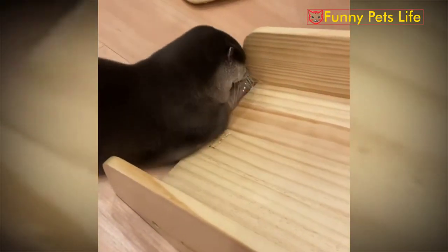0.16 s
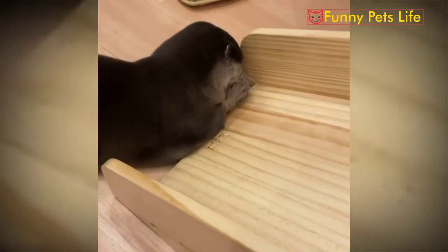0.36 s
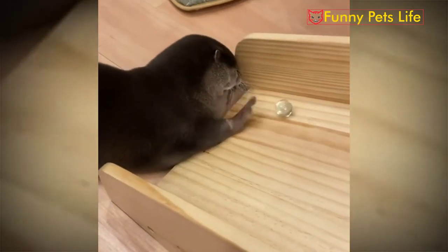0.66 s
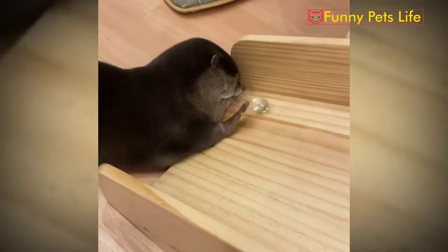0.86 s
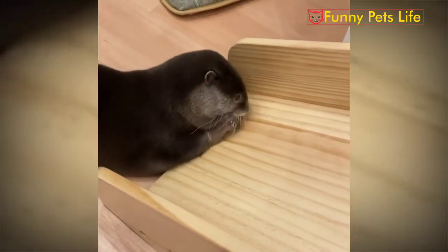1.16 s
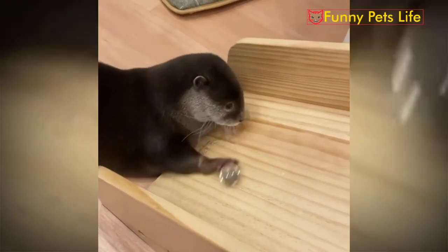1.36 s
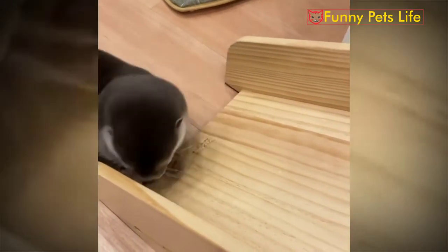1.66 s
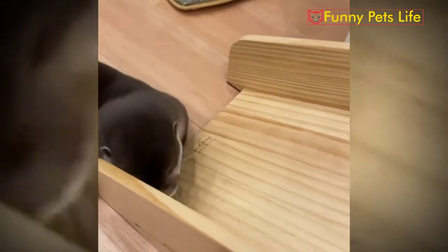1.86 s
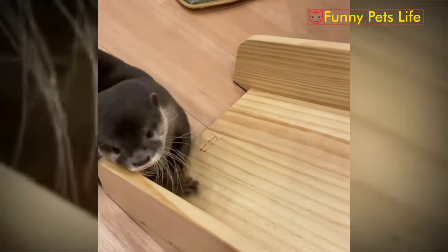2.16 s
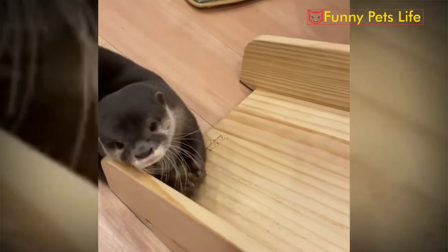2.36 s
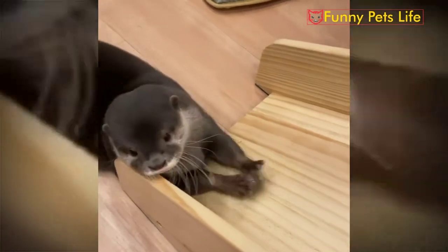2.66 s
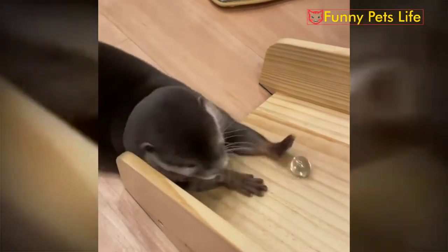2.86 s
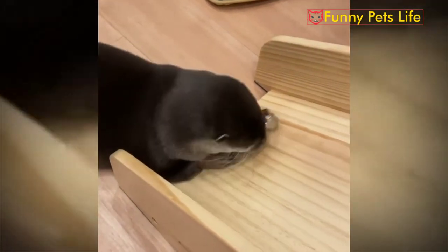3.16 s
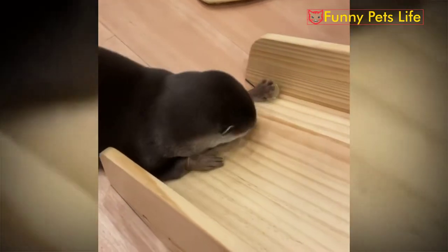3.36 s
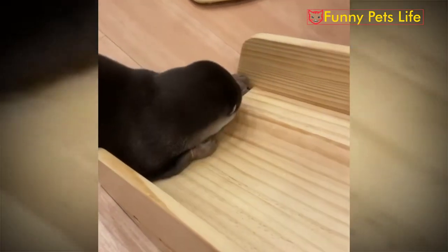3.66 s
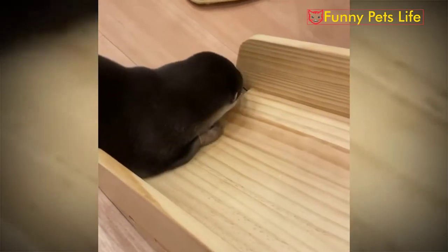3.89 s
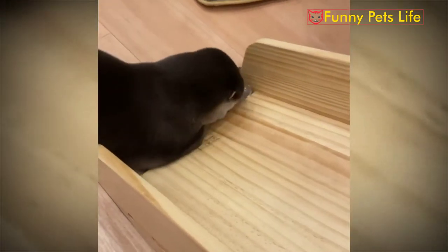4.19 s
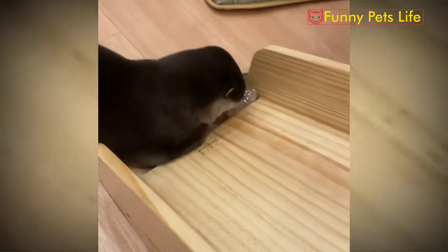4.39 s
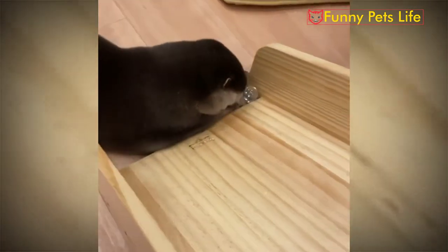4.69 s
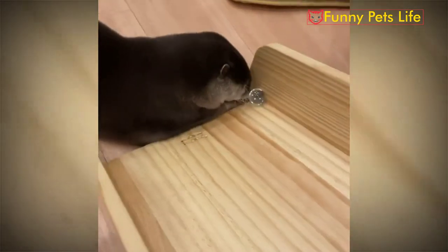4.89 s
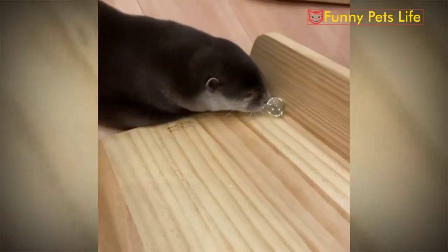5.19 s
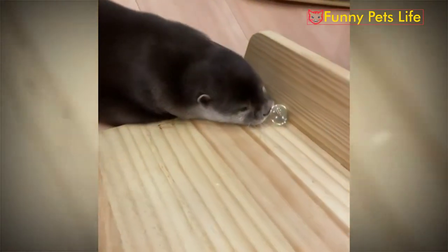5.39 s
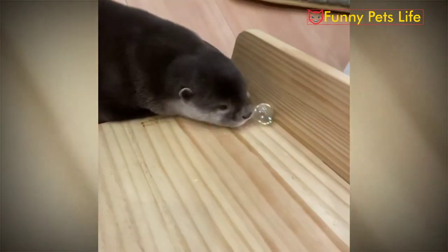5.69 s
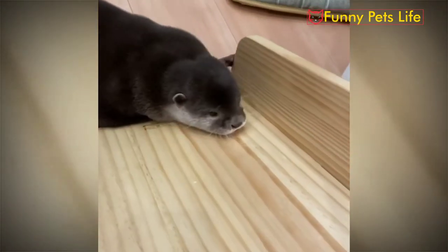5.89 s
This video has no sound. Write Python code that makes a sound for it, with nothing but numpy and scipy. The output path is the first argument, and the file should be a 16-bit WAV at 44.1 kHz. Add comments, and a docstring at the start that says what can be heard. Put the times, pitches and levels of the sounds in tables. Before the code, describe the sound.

A glass marble rumbles and clacks around a hollow wooden tray as an otter pushes it, with faint brushing of fur and paws.

```python
"""A glass marble rumbles over the grain of a hollow wooden tray as an otter pushes it about.
It bounces on the boards and clacks against the rim; the boards carry each blow as a bending wave,
treble first. Fur and paws brush the wood. A handheld phone, a step away, hears it all in a small
room that rings on over a quiet hum."""
import sys
import numpy as np
from scipy import signal
from scipy.fft import rfft, irfft
from scipy.io import wavfile
from scipy.ndimage import uniform_filter1d

SR = 44100
rng = np.random.default_rng(int(sys.argv[2]) if len(sys.argv) > 2 else 0)


def unload_audio(sound):
    """Save the sound as a 16-bit wav file, at the path given as the first command line argument."""
    columns = np.transpose(np.atleast_2d(sound))
    # keep every value between -1 and 1, then stretch to whole-number steps
    steps = np.round(np.clip(columns, -1, 1) * 32767)
    wavfile.write(sys.argv[1], SR, steps.astype(np.int16))


N = 266212

# The rolling marble, one list per stretch. Each row: time in seconds, level in dB, extra grit gain in dB.
ROLLS = [
    [(0.0, -28, -2), (0.048, -25.5, -13), (0.13, -36.5, -5)],
    [(0.2, -49, 8), (0.354, -45.5, -4), (0.44, -69, 12), (0.445, -56, -3)],
    [(0.5, -32.5, -24), (0.69, -29.5, -49), (0.734, -85, -19), (0.798, -38, -33), (0.812, -40.5, -35),
     (0.895, -31.5, -31)],
    [(0.94, -29.5, -27), (1.024, -43, -18), (1.104, -24.5, -34), (1.21, -47.5, -37), (1.27, -21.5, -23),
     (1.29, -17.5, -10), (1.35, -17.5, -14.5), (1.438, -24.5, -14), (1.46, -32.5, 5)],
    [(1.52, -57, 1), (1.582, -33, -16), (1.7, -25, -18), (1.91, -73, 19.5), (1.92, -48, -14),
     (2.002, -66.5, 5), (2.078, -36, -25), (2.26, -49.5, -41)],
    [(2.27, -44.5, -25), (2.35, -30.5, -11.5), (2.41, -45, -16), (2.506, -42, -13), (2.622, -24.5, -16),
     (2.67, -35, -4.5)],
    [(2.68, -32.5, -8.5), (2.702, -23.5, -30), (2.83, -34, -41), (2.93, -24, -27), (2.985, -22, -18),
     (3.036, -21, -26), (3.06, -27.5, -28), (3.08, -37, -31)],
    [(3.09, -37, -38), (3.128, -28, -14), (3.158, -15.5, -23), (3.18, -18, -22), (3.215, -16.5, -14.5),
     (3.24, -23, -13)],
    [(3.33, -36, -4.5), (3.374, -43, -9), (3.59, -40, -9)],
    [(3.615, -32, -1.5), (3.638, -22, -4.5), (3.736, -53.5, 2), (3.76, -53, -17)],
    [(4.77, -58.5, 13.5), (4.815, -43, 1.5), (4.83, -41.5, -11), (4.858, -34.5, -27), (4.936, -48, -35),
     (4.992, -29, -14), (5.044, -24, -24), (5.148, -41.5, -17), (5.165, -42, -21.5), (5.19, -36, -20),
     (5.25, -39, -18), (5.28, -46.5, -17.5), (5.3, -42.5, -21), (5.36, -43, -9), (5.4, -41.5, -12.5),
     (5.44, -52.5, -1.5), (5.486, -37.5, -29), (5.535, -55, -33), (5.56, -69, -21), (5.6, -78, -24)],
    [(5.61, -58.5, -3.5), (5.64, -50, -2), (5.674, -30.5, -10), (5.74, -28.5, -8), (5.765, -25.5, -14.5),
     (5.81, -28, -9), (5.87, -28.5, -13), (5.925, -32, -12)],
    [(5.96, -33, 6.5), (5.988, -42, 1.5), (6.035, -26.5, -7)],
]
# Soft jolts as the marble crosses a ridge of the grain. Each row: time in seconds, boost in dB.
JOLTS = [(0.32, 12.5), (0.672, 1.5), (0.819, 8), (0.851, 8.5), (1.106, -0.5), (2.608, 4), (2.705, 6.5),
         (2.735, 4.5), (3.002, -3), (3.037, 3.5), (3.153, 7), (4.841, 13.5), (4.987, 4), (5.77, 8),
         (5.84, 2.5), (5.901, 10)]
# The tray floor's modes, the tones it rings with. Each row: pitch in Hz, level in dB,
# seconds to fade by 60 dB (capped by LOADED_T60_S).
BOARD_MODES = [(92.4, 13, 0.2), (177.5, -9.5, 0.19), (213.1, -5, 0.2), (243.8, -0.5, 0.1),
               (281.4, -5.5, 0.1), (306, -7.5, 0.051), (336.8, -1, 0.077), (368.3, 0, 0.073),
               (409.4, -4.5, 0.04), (451, -6, 0.072), (479.3, -5.5, .07), (521, 2, 0.2), (556.3, -6, 0.14),
               (607.4, -2, 0.1), (656.3, 2, 0.073), (708.5, 4, 0.026), (783, 5, 0.043), (838.3, -3, 0.077),
               (943.6, 3, 0.41), (1041, 4.5, 0.14), (1118.3, 6, 0.18), (1225, 8.5, 0.23), (1390, 2, 0.11),
               (1559, 5.5, 0.14), (1667, 6.5, 0.25), (2229, 9, 0.068), (2628, 2.5, 0.018),
               (3436, 0.5, 0.0074)]
# The pitch regions that ring under the moving marble. Each row: time in seconds, low region in Hz,
# upper region in Hz, gain of the upper region in dB, gain of a top region above it in dB.
REGIONS = [(0, 335, 810, 4, 6), (.3, 285, 630, 3, 2), (.6, 298, 688, 2.5, -39),
           (1.1, 336, 663, -12.5, -43.5), (1.25, 353, 710, 9, -23), (1.31, 400, 666, -12, -24),
           (1.4, 275, 730, -5, -10), (1.7, 330, 620, -0.5, -6.5), (2.1, 340, 614, -4, -38),
           (2.31, 342, 800, 11, -17), (2.36, 363, 594, 6.5, -12), (2.43, 360, 565, 7, -12),
           (2.52, 402, 716, 18, -12), (2.57, 402, 666, 22, -4), (2.62, 347, 563, 13.5, 8.5),
           (2.67, 405, 590, 16, -2), (2.7, 463, 615, -8, -3), (2.745, 350, 594, -14, -8.5),
           (2.85, 304, 567, 0, -25), (2.93, 214, 667, -10.5, -23), (2.99, 277, 686, -11, -16.5),
           (3.04, 352, 705, -12, -35), (3.16, 318, 690, -8, -39), (3.24, 300, 674, 4, 2.5),
           (3.4, 280, 726, 13.5, -1), (3.7, 343, 810, 4.5, -12.5), (4.8, 328, 534, -3.5, 11),
           (4.87, 342, 536, 2.5, -0.5), (5.03, 235, 512, 1, -2.5), (5.1, 266, 520, 2, -6.5),
           (5.2, 300, 510, -1, -9), (5.3, 293, 516, 6, -7.5), (5.5, 295, 520, 9, -0.5),
           (5.66, 219, 520, -13, -20.5), (5.77, 237, 530, -5, -3), (5.84, 230, 530, -12, -6),
           (5.9, 248, 525, -4, 1), (6.0, 331, 615, 7, -3)]
# The upper region narrows along the rim, where one board sings.
# Each row: time in seconds, width in octaves.
UPPER_WIDTH = [(0, 0.25), (2.4, 0.36), (2.55, 0.16), (2.7, 0.28), (4.7, 0.6), (4.8, 0.1), (5.55, 0.058),
               (5.91, 0.047), (6.0, 0.16)]
# The tone colour of the room's hum. Each row: pitch in Hz, gain in dB.
HUM_COLOUR = [(15, -39), (25, -29.5), (50, -12.5), (101, -8), (166, -17.5), (671, -9), (786, -11),
              (897, -7.5), (1370, -16.5), (1730, -45.5), (1920, -23), (3010, -15.5), (11800, -36),
              (13500, -58)]
# The marble's blows. Each row: start in seconds, level in dB, contact pitch in Hz, fall above that pitch
# in dB per octave, rim against boards in dB, travel time of a 700 Hz bending wave in milliseconds.
BLOWS = [(.025, -11.5, 655, 3.5, -38, 3.01), (.140, -9, 770, -2.5, 15.5, 2.9),
         (.1445, -10.5, 900, 4, 9.5, 2.17), (.152, -7.5, 1400, 19, -27, 2.93),
         (.168, -11.5, 1220, 10, 10, 3), (.181, -23, 910, 17, -2, 3), (.453, -2, 840, 11, -12.5, 2.69),
         (.462, -18, 600, 9, -35.5, 2.78), (.844, -20, 704, 15, -33, 1.15), (.902, -5.5, 764, 8, -26, 3.3),
         (1.295, -8, 636, 6, -12, 2.65), (1.470, 3.5, 1470, 8.5, -3, 2.6),
         (1.709, -27, 1200, -12.5, 0.5, 3.6), (3.246, -9.5, 1310, 12, -7, 4.4),
         (3.255, 5.5, 1400, 3, -5, 2.14), (3.260, -12.5, 1220, 22, -24, 2.16),
         (3.306, -7.5, 1390, 17.5, -6.5, 2.16), (3.604, 2.5, 660, -1, -5.5, 3.07),
         (3.893, -17, 700, 5, -32, 3.23), (4, -32, 1900, -4.5, -1, 2.3),
         (4.112, -3.5, 1620, 18, -3.5, 3.17), (4.123, -4, 1150, 15.5, -20, 3.12),
         (4.125, -11, 1380, -2.5, 18.5, 3.33), (4.383, -7, 770, 3, -22.5, 2.77),
         (4.431, -10, 810, 4, -40.5, 2.08), (4.459, 3, 1700, 10, -8, 2.28), (4.472, -9, 1080, 9, -32, 2.87),
         (4.48, -8.5, 1200, 4.5, 9.5, 2.68), (4.489, -3, 1110, 9, 9.5, 2.88),
         (5.687, -20, 1100, 7, -23.5, 1.23), (5.750, -8, 1140, 10, -36, 1.8),
         (5.797, -26, 1000, -8.5, 9, 4), (5.891, -11, 1140, 27, -40, 1.27), (5.932, 4, 640, 1, -8.5, 0.76),
         (6.017, -7, 671, 2.5, -4, 1.44)]
# The tones of the upright rim. Each row: pitch in Hz, level in dB, seconds to fade by 60 dB.
RIM_MODES = [(2403, -6.5, 0.012), (2775, -1, .009), (2947, 1, 0.014), (3407, -4.5, 0.006),
             (4134, -5, 0.009), (4706, -7, .008), (5510, -9.5, .008), (6480, -12.5, .006),
             (10400, -23.5, .004)]
# Fur and paws on the wood. Each row: time in seconds, gain in dB.
FUR_GAIN = [(0.0, -84), (0.23, -91), (.35, -73.5), (.43, -92.5), (0.599, -64.5), (0.74, -102), (1.2, -79),
            (1.31, -66), (1.44, -75.5), (1.98, -72.5), (2.15, -72), (2.25, -93), (2.37, -75), (2.52, -77.5),
            (3.17, -68), (3.34, -80.5), (4.45, -78.5), (4.6, -70), (4.73, -71), (5.4, -85.5), (5.58, -104),
            (5.66, -85), (5.84, -68), (6.03, -89)]
# Timing at the phone's two microphone openings. Each row: pitch in Hz, lead of the left one in radians.
PORT_LEAD = [(0, 0), (860, -.7), (2070, 0), (2580, 1.4), (3620, .6), (5600, .3), (6460, 2.9), (8870, 3.1),
             (9730, 6.1), (12300, 6.4), (22050, 6.4)]
# Balance between those openings. Each row: pitch in Hz, left minus right in dB.
PORT_TILT = [(60, -0.5), (110, 0.5), (200, -1), (360, -4), (660, -6), (1190, -6.5), (2170, 0), (3940, -3),
             (7170, 3), (13000, -2.5)]
# How long the room rings. Each row: pitch in Hz, seconds to fade by 60 dB.
ROOM_DECAY = [(150, 0.41), (500, 0.48), (2000, 0.54), (5000, 0.38), (12000, 0.062)]
# The microphone's tone colour. Each row: pitch in Hz, gain in dB.
MIC_COLOUR = [(200, 13), (5500, -15.5), (8000, -22.5), (10500, -22.5), (12400, -25.5), (13600, -36.5)]

LOADED_T60_S = 0.17  # the otter's weight lets no board take longer to fade by 60 dB


def undb(db):
    """Turn decibels into a gain."""
    return 10 ** (np.asarray(db) / 20)


def unit(x):
    """Scale x to an average power of 1."""
    return x / np.sqrt(np.mean(x ** 2))


def shape(x, points, turn=0):
    """Colour x by (Hz, dB) points and turn its phase."""
    hz = np.fft.rfftfreq(x.shape[-1], 1 / SR) + 1
    at, db = np.transpose(points)
    gain = undb(np.interp(np.log(hz), np.log(at + 1), db))
    return irfft(rfft(x) * gain * np.exp(1j * turn), x.shape[-1])


def curves(rows):
    """Join a table's rows over time: one curve for each column after the first."""
    times, *columns = np.transpose(rows)
    return [np.interp(np.arange(N) / SR, times, column) for column in columns]


def drift(rate, count=1):
    """Random curves that glide to a new value rate times a second."""
    hold = int(SR / rate)
    steps = np.repeat(rng.standard_normal((count, N // hold + 1)), hold, axis=1)
    return 1.3 * uniform_filter1d(steps, hold)[:, :N]


def even(x, hz):
    """Level out the chance peaks, about hz wide, in the spectrum of a noise burst."""
    size = 2 * x.shape[-1]
    spectrum = rfft(x, size)
    mean = lambda width: np.sqrt(uniform_filter1d(np.abs(spectrum) ** 2, 1 + int(width * size / SR)))
    return irfft(spectrum * mean(30 * hz) / mean(hz), size)[..., :x.shape[-1]]


def ring(x, hz, t60):
    """One mode shaken by x, with the same power whatever its decay."""
    r = np.exp(-np.log(1000) / (t60 * SR))
    return np.sqrt(1 - r) * signal.lfilter([1, 0, -1], [1, -2 * r * np.cos(2 * np.pi * hz / SR), r * r], x)


def rumble(bumps):
    """The bumps' energy is shared among the board modes under the marble."""
    low_hz, upper_hz, upper_db, top_db = curves(REGIONS)
    hz, db, t60 = np.transpose(BOARD_MODES)[:, :, None]
    region = lambda centre_hz, octaves: np.exp(-(np.log2(hz / centre_hz) / octaves) ** 2)
    upper = undb(upper_db + 5) * region(upper_hz, curves(UPPER_WIDTH)[0])
    top = undb(top_db) * region(1.724 * upper_hz, 0.25)
    rest = 0.16 * (1 + hz / 900) ** -2.5  # a gentle contact hardly stirs the high modes
    wander_db = 3.5 * drift(12, count=len(BOARD_MODES))  # the marble crosses each mode's still spots
    shares = (region(low_hz, 0.32) + upper + top + rest) * undb(db + wander_db)
    shares /= np.sqrt((shares ** 2).sum(axis=0))
    return sum(ring(bumps * share, pitch, min(decay, LOADED_T60_S))
               for share, pitch, decay in zip(shares, hz[:, 0], t60[:, 0]))


def rolling():
    """Dense, uneven bumps of the grain shake the boards; grit hisses on top in short scratches."""
    t = np.arange(N) / SR
    level_db, grit_db = curves(np.concatenate(ROLLS))
    moving = sum((t >= rows[0][0]) & (t <= rows[-1][0] + .012) for rows in ROLLS) > 0
    jolt_db = sum(db * np.exp(-((t - at) / 0.014) ** 2) for at, db in JOLTS)
    gain = undb(level_db + jolt_db + 1.78 * drift(60)[0]) * uniform_filter1d(1. * moving, size=400)
    bumps = gain * unit(rng.standard_normal(N) * undb(2.42 * rng.exponential(size=N)))
    boards = rumble(bumps)
    scratch_db = 2 * np.repeat(rng.exponential(size=N // 64 + 1), 64)[:N]
    scratches = unit(undb(scratch_db + 2.27 * drift(30)[0]))
    grit = shape(bumps * scratches * undb(grit_db),
                 [(800, -12.5), (1600, -2), (3000, -4), (4300, -12), (5400, -6), (7500, -13),
                  (10500, -11.5), (13000, -23)])
    return undb(-6.5) * boards + undb(13.5) * grit


def hum():
    """Steady room noise, alike on the left and right in the bass."""
    mid, side = rng.standard_normal((2, N))
    side = shape(side, [(60, -36), (300, -9), (1000, 1.5), (13000, 1)])
    return undb(-54.5) * unit(shape(np.array([mid + side, mid - side]), HUM_COLOUR))


def struck_wood(modes, contact_hz, fall_db, travel_s, t):
    """Wood after one blow: low modes arrive late, and the contact pitch sets which are strong."""
    hz, db, t60 = np.transpose(modes)[:, :, None]
    level_luck, pitch_luck = rng.standard_normal((2, len(modes), 1))
    age = np.maximum(t - travel_s * (700 / hz) ** 0.824, 0)  # high bending waves run faster
    octaves = np.log2(hz / contact_hz)
    size = undb(db + 2 * level_luck - fall_db * np.maximum(octaves, 0) + 13.2 * np.minimum(octaves, 0))
    swell = 1 - np.exp(-age * hz / 3.4)
    passing = np.exp(-age * hz / 2.07)  # most of the wave leaves at once
    ringing = 0.018 * np.exp(-np.log(1000) * age / np.minimum(t60, LOADED_T60_S))
    tones = np.sin(2 * np.pi * hz * (1 + 0.025 * pitch_luck) * age)
    sound = (size * swell * (passing + ringing) * tones).sum(axis=0)
    return sound / np.abs(sound).max()


def blows():
    """Each blow knocks the boards, gives a glassy tick and chatters briefly against the rim."""
    out, t = np.zeros(N + SR), np.arange(SR // 8) / SR
    glass_band = signal.butter(1, [3800, 9000], "band", fs=SR, output="sos")
    for start, db, contact_hz, fall_db, rim_db, travel_ms in BLOWS:
        boards = struck_wood(BOARD_MODES, contact_hz, fall_db, travel_ms / 1000, t)
        chatter_t60 = 0.022 * 2 ** (rim_db / 24.5)  # more rim, longer chatter
        chatter = even(rng.standard_normal(len(t)) * undb(-60 * t / chatter_t60), hz=40)
        rim = struck_wood(RIM_MODES, contact_hz=3870, fall_db=0, travel_s=0, t=t)
        rim = signal.fftconvolve(rim, chatter)[:len(t)]
        rim /= np.abs(rim).max()
        tick = signal.sosfilt(glass_band, chatter * np.exp(-t / 0.0019) * (1 - np.exp(-t / 0.00046)))
        tick /= np.sqrt(np.sum(tick ** 2) / 60)
        tick_db = -2 + 0.63 * rim_db - 0.77 * fall_db  # louder with more rim or a harder contact
        at = int(start * SR)
        out[at:at + len(t)] += undb(db) * (boards + undb(tick_db) * tick + undb(rim_db) * rim)
    return out[:N]


def fur():
    """Many hairs brush the wood in a fine, dry, flickering rustle."""
    hairs = rng.standard_normal(N) * undb(1.4 * rng.exponential(size=N) + 2.6 * drift(40)[0])
    rustle = shape(unit(hairs), [(2000, 3.6), (5000, 30.5), (9000, 34.2), (14000, 30.4)])
    return rustle * undb(curves(FUR_GAIN)[0])


def mic_ports(x):
    """Each microphone opening hears a near sound with its own level and phase at each pitch."""
    lead = np.interp(np.fft.rfftfreq(N, 1 / SR), *np.transpose(PORT_LEAD))
    return np.array([shape(x, np.array(PORT_TILT) * [1, side], side * lead) for side in (.5, -.5)])


def room(x):
    """Quick echoes off floor, rim and furniture, then a tail that fades at its own pace in each octave."""
    t, early, late = np.arange(SR) / SR, 0, 0
    pitches, decays = np.transpose(ROOM_DECAY)
    for hz in 100 * 2. ** np.arange(8):
        t60 = np.interp(np.log(hz), np.log(pitches), decays)
        octave = [(hz / 2, -40), (hz / 2 ** .5, -3), (hz, 0), (hz * 2 ** .5, -3), (hz * 2, -40)]
        mid, side = shape(rng.standard_normal((2, SR)), octave)
        side *= min(hz / 880, 1)  # the bass is alike on both sides
        band = np.array([mid + side, mid - side]) * (1 - np.exp(-t / 0.005))
        early += band * undb(21 - 60 * t / 0.035)
        late += band * undb(-60 * t / t60)
    echoes = unit(even(early, hz=20) + even(late, hz=20)) / np.sqrt(SR)
    return undb(-4.5) * signal.fftconvolve(x[None], echoes, axes=1)[:, :N]


def scene():
    """The tray's sounds, their echoes and the hum, coloured by the microphone."""
    bass_cut = signal.butter(4, 182, "high", fs=SR, output="sos")
    tray = signal.sosfilt(bass_cut, rolling() + blows() + fur())
    return shape(mic_ports(tray) + room(tray) + hum(), MIC_COLOUR)


def record(dry):
    """The phone dims the treble in quiet moments, rounds the loudest peaks and cuts the very top."""
    quiet_db, treble_hz, top_hz = -50.5, 880, 13600
    loudness = np.sqrt(uniform_filter1d((dry ** 2).mean(axis=0), size=1800) + 1e-12)
    low = signal.sosfiltfilt(signal.butter(2, treble_hz, fs=SR, output="sos"), dry)
    dimmed = low + (dry - low) * np.minimum(loudness / undb(quiet_db), 1) ** 0.76
    rounded = np.tanh(1.181 * dimmed) / 1.439
    return signal.sosfilt(signal.ellip(8, .2, 70, top_hz, fs=SR, output="sos"), rounded)


dry = scene()
out = record(dry)
unload_audio(out)
```